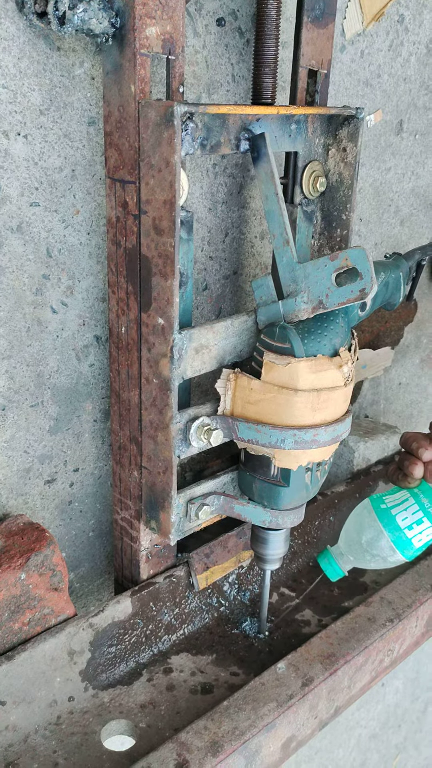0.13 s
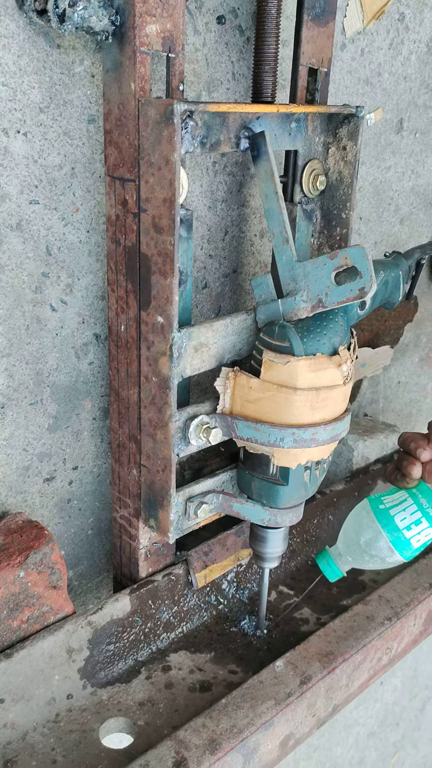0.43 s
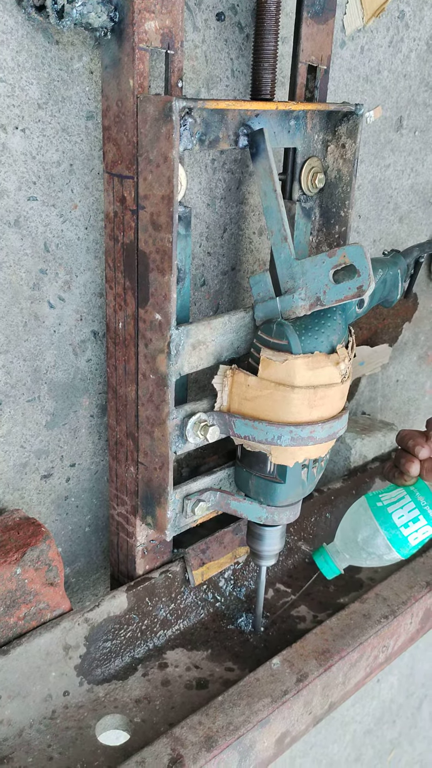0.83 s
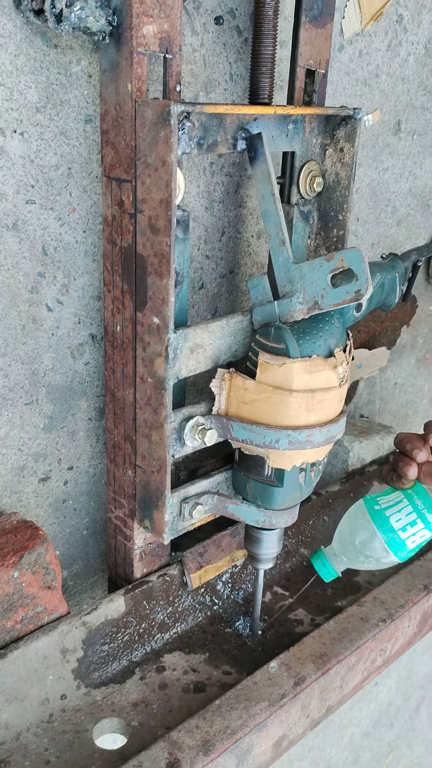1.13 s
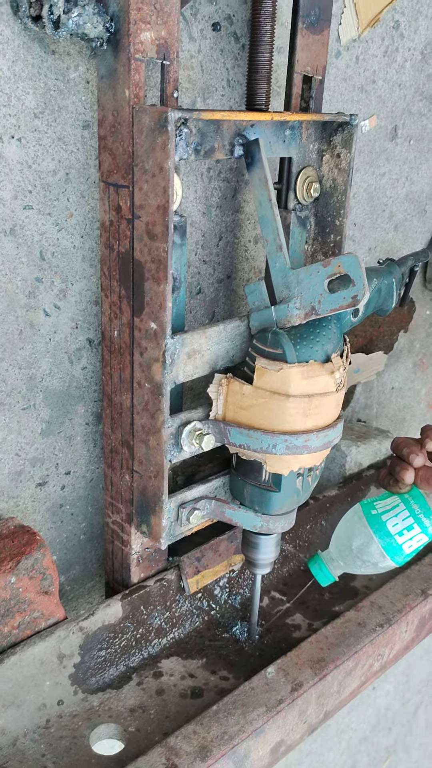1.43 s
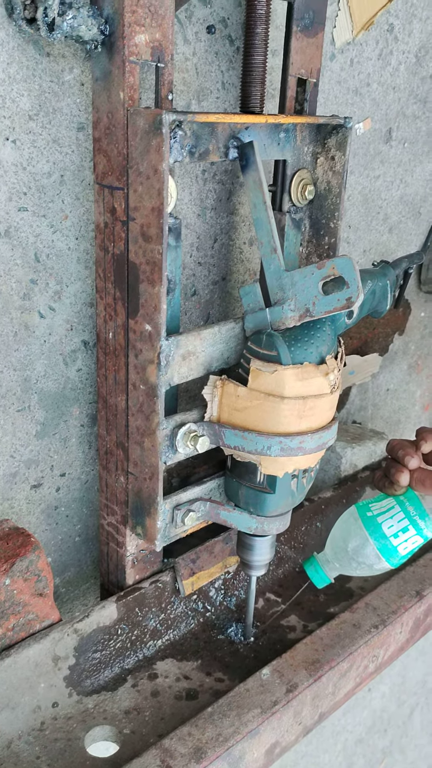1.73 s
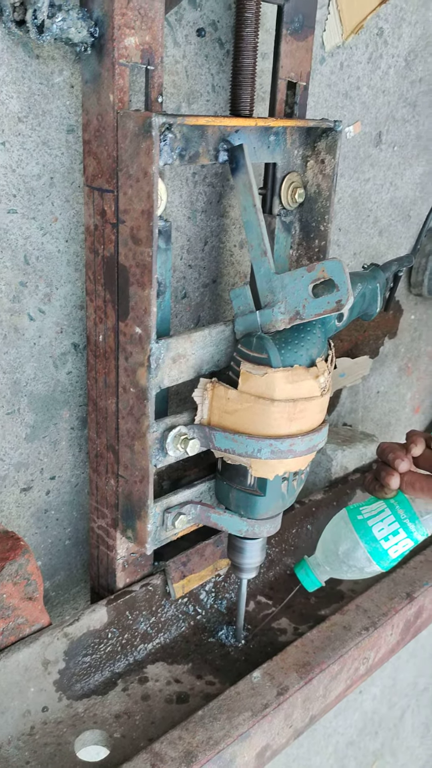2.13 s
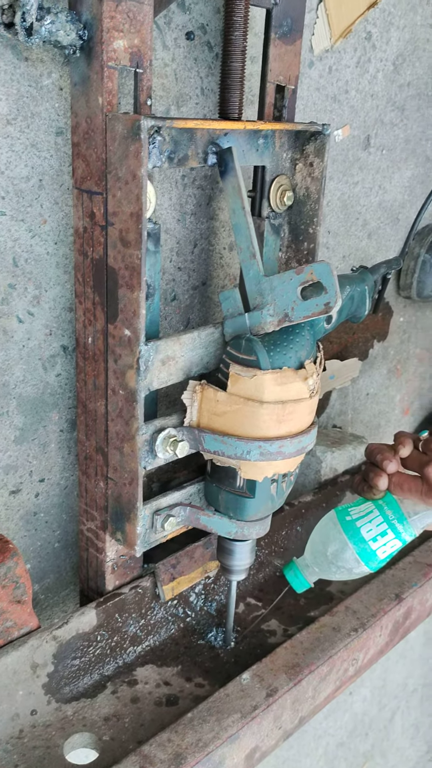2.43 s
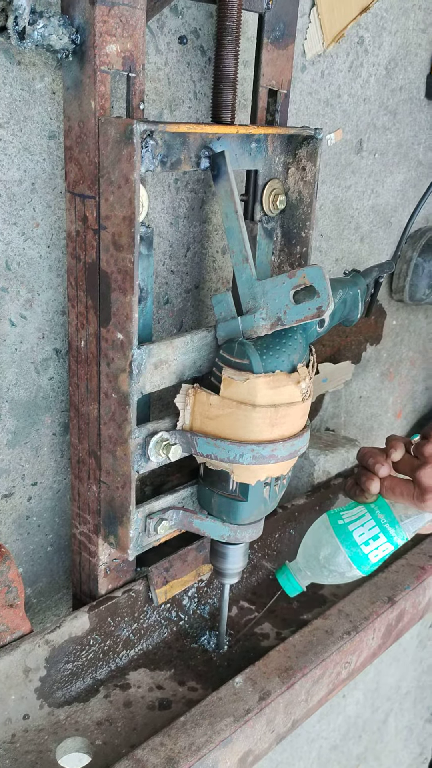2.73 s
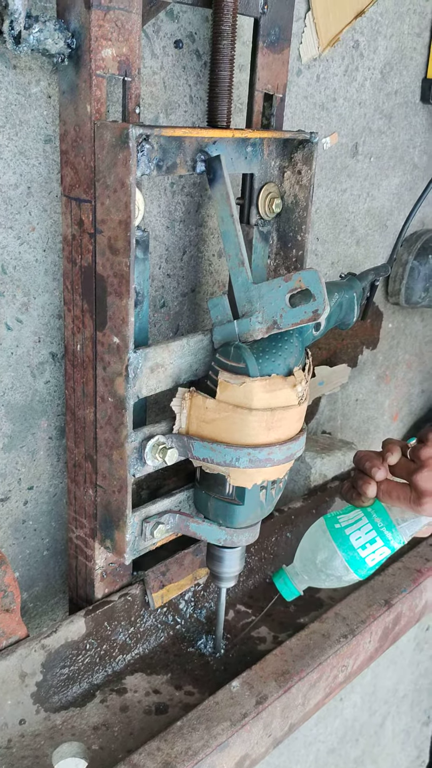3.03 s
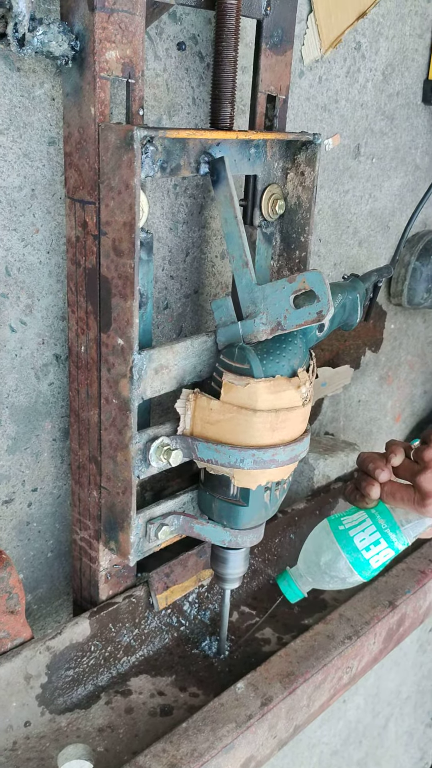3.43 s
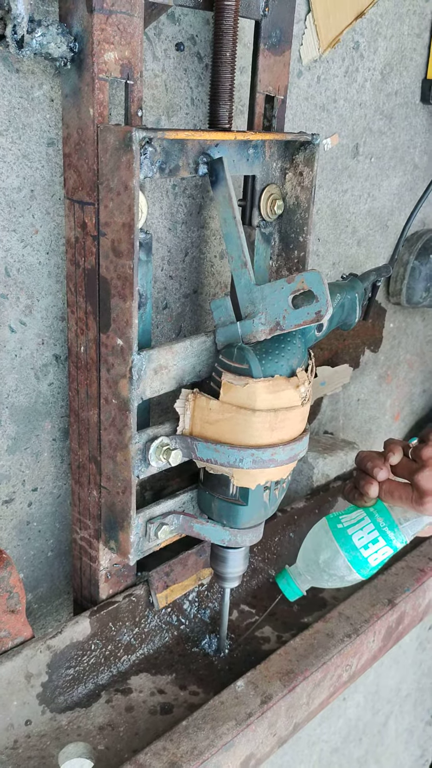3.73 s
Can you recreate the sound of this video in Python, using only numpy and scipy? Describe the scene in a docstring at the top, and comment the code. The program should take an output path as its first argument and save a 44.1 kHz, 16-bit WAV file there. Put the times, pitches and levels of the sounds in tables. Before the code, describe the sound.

An electric drill runs loudly throughout, boring steel close to stereo microphones in a workshop with short echo. Its fluttering gear whine, about 1.5 kHz, rises until 1.2 s, sags to about 2.2 s, climbs to 3.2 s, then eases slightly. Fan rush, gritty grinding and fine chip crackle continue. Scraping screeches swell around 0.2, 0.4 and 2.3 s; dull stand knocks and low rumble occur mainly before 1.4 s.

```python
"""An electric drill, clamped in a feed stand, bores into a steel beam close to a pair of microphones.
Its gears whine at the tooth-mesh rate and two harmonics, fluttering with each spindle turn; weaker tones
of fan, armature and gear sidebands glide through body resonances, over the shaped noise of fan and grinding.
The motor sags as the feed presses harder and the grinding swells; the whine wanders between left and right.
Gaussian bursts of noise scrape and screech, chips crackle, a low rumble varies and the stand knocks dully."""
import sys
import numpy as np
from scipy import signal
from scipy.fft import rfft, irfft
from scipy.io import wavfile

SR = 44100
rng = np.random.default_rng(int(sys.argv[2]) if len(sys.argv) > 2 else 0)


def generate_wav(sig):
    """Save sig (samples, or channels by samples) to the path in sys.argv[1] as 16-bit PCM at SR."""
    pcm = np.round(np.clip(np.atleast_2d(sig).T, -1, 1) * 32767).astype(np.int16)
    wavfile.write(sys.argv[1], SR, pcm)


N = 171990
T = np.arange(N) / SR  # t/s
HZ = np.fft.rfftfreq(N, 1 / SR)  # f/Hz


def amp(db):
    """Logarithmic level: decibels to an amplitude ratio."""
    return 10 ** (np.asarray(db) / 20)


def unit(x):
    """Normalisation: scales a signal to an rms of one."""
    return x / np.sqrt(np.mean(abs(x) ** 2) + 1e-20)


def curve(rows, axis=1):
    """Linear interpolation of one table column over time."""
    rows = np.array(rows)
    return np.interp(T, rows[:, 0], rows[:, axis])


def spectrum(rows, axis=1):
    """Interpolation of one table column over log frequency."""
    rows = np.array(rows)
    return np.interp(np.log(HZ + 1), np.log(rows[:, 0]), rows[:, axis])


def colour(x, db):
    """Linear filtering: multiplies the spectrum by a gain at each frequency."""
    return irfft(rfft(x) * amp(db), N)


def wander(hz):
    """Low-pass random fluctuation of unit rms, its spectrum halved in amplitude at hz."""
    lowpass = 1 / (1 + (HZ / hz) ** 2)
    return unit(irfft(rfft(rng.standard_normal(N)) * lowpass, N))


def complex_wander(hz):
    """Random modulation of amplitude and phase: independent real and imaginary fluctuations."""
    return wander(hz) + 1j * wander(hz)


def rightward(db):
    """Level-difference panning: left lowered and right raised by db."""
    return amp([[-db], [db]])


def cycle(turns):
    """Rotating phasor: one revolution per turn, from a random starting phase."""
    return np.exp(2j * np.pi * (turns + rng.random()))


def swell(s, half):
    """Gaussian envelope: peaks at s and falls to 1/e after half a length either side."""
    return np.exp(-((T - s) / half) ** 2)


ROOM_T60_S, ROOM_DB = 0.32, -13.5  # decay time; echo level against the direct sound


def workshop(x):
    """Diffuse reverberation: convolution with decaying noise, independent at each microphone."""
    t = T[:SR // 3]
    tails = rng.standard_normal((2, len(t))) * amp(-60 * t / ROOM_T60_S)
    tails *= amp(ROOM_DB) / np.linalg.norm(tails, axis=1, keepdims=True)
    echo = signal.oaconvolve(x * np.ones((2, 1)), tails, axes=1)[:, :N]
    return x + echo


# runout of the uneven gear wheel, before the flutter factor of each harmonic
# (cycles per spindle turn, depth/dB)
WHEEL_RUNOUT = [(1, -19), (2, -32), (3, -29), (4, -30), (5, -29), (6, -49)]
RUNOUT_SWING = 0.73  # imaginary (phase) part of the runout, relative to the real (amplitude) part
MAINS_PULSE_HZ, MAINS_DEPTH = 100, 0.027
SHIMMER, SHIMMER_HZ = 0.081, 138  # random modulation: rms of each part, corner f/Hz
WHINE_DRIFT_DB, WHINE_DRIFT_HZ = 1.2, 9  # rms level drift/dB, corner f/Hz


def gear_tone(mesh, spindle, levels, flutter):
    """Tooth-mesh radiation: a tone with sidebands from wheel runout, mains pulsing and shimmer."""
    runout = sum(amp(db) * cycle(-k * spindle) for k, db in WHEEL_RUNOUT)
    wobble = runout.real + 1j * RUNOUT_SWING * runout.imag
    wobble = wobble + MAINS_DEPTH * cycle(MAINS_PULSE_HZ * T).real
    left = amp(curve(levels, axis=1)) * np.exp(1j * curve(levels, axis=3))
    right = amp(curve(levels, axis=2))
    ports = np.array([left, right])
    ports *= amp(WHINE_DRIFT_DB * np.array([wander(WHINE_DRIFT_HZ) for _ in ports]))
    shimmer = SHIMMER * np.array([complex_wander(SHIMMER_HZ) for _ in ports])
    modulation = 1 + flutter * (wobble + shimmer)
    return np.sqrt(2) * (ports * cycle(mesh) * modulation).real


# harmonics of the tooth mesh at the microphones, before drift and flutter
# (t/s, left level/dB, right level/dB, left phase lead/rad)
WHINE_LEVELS = [(0.0, -21, -29, 2.2), (0.09, -25, -18.5, 0.91), (0.21, -14.5, -22.5, 1.6),
                (0.39, -14.5, -16, 1.46), (0.54, -16.5, -16.5, 2.57), (0.63, -13.5, -17, 2.25),
                (0.69, -17, -18.5, 2.63), (0.9, -15.7, -19.5, 2.57), (0.99, -21.5, -20.5, 2.7),
                (1.2, -20, -26.5, 2.95), (1.4, -18, -17, 2.83), (1.43, -19, -16.5, 2.07),
                (1.53, -14, -17.5, 2.08), (1.74, -14, -17.2, 1.91), (1.86, -15, -20.5, 1.9),
                (2.1, -17.5, -18.5, 2.16), (2.22, -18, -15.5, 1.62), (2.28, -20.5, -17, 1.6),
                (2.4, -15, -20, 1.42), (2.67, -14.5, -16.5, 2.07), (2.76, -16.5, -19, 2.25),
                (2.82, -18, -16, 2.09), (3.33, -18, -20.5, 3.05), (3.69, -12.5, -17, 1.92),
                (3.78, -14, -19.5, 2.36), (3.89, -12, -18, 2.05)]
OCTAVE_LEVELS = [(0.0, -26, -23, 2.5), (0.09, -18, -19, 1.57), (0.15, -16, -20, 2.0), (0.21, -21, -20.5, 5),
                 (0.27, -23, -19, 4.5), (0.36, -18, -20, 4), (0.48, -27, -21.5, 3), (0.75, -30, -27, 0.8),
                 (0.81, -30, -37, 3.5), (0.835, -21, -23, 8), (0.9, -23, -18.5, 7), (1.02, -29, -22, 8.5),
                 (1.2, -30, -24, 7), (1.3, -28, -23, 7.5), (1.38, -26, -16.8, 5.0), (1.44, -29, -32, 4),
                 (1.59, -19, -22, 3.5), (1.69, -24, -20, 4), (1.73, -28, -29, 1), (1.77, -26.5, -22.5, 0.3),
                 (1.89, -26, -20.5, -0.5), (2.16, -19.5, -42, -1), (2.31, -12.5, -16, -2.5),
                 (2.4, -18, -17, -1), (2.7, -26, -22.5, -1.1), (2.85, -29, -24.5, -5), (3.04, -34, -29, -5),
                 (3.09, -20.5, -34, -8), (3.18, -24.2, -21.5, -8), (3.42, -25, -21, -7.0),
                 (3.48, -26, -30, -5), (3.65, -29, -31, -7), (3.73, -26, -24.5, -8.5),
                 (3.89, -32, -29, -5.5)]
THIRD_LEVELS = [(0.0, -28, -26, -1.5), (0.21, -42, -33, -2), (0.42, -34, -23, -3), (0.57, -39, -37, -4.5),
                (0.9, -33, -28, -2), (1.23, -45, -37.2, -9.1), (1.38, -35, -27.5, -11),
                (1.71, -32.4, -26, -11), (1.83, -42.1, -29.5, -6), (2.22, -54, -30, 2),
                (2.28, -46, -19.5, -11), (2.37, -36, -29.5, -7.5), (3.3, -41, -30.5, -11.5),
                (3.7, -37, -24.5, -11), (3.89, -32, -23, -11)]
OCTAVE_FLUTTER, THIRD_FLUTTER = 1.74, 1.8  # relative to the whine's flutter


def gears(mesh, spindle):
    """Harmonic series: the tooth-mesh fundamental with its second and third harmonics."""
    whine = gear_tone(mesh, spindle, WHINE_LEVELS, 1)
    octave = gear_tone(2 * mesh, spindle, OCTAVE_LEVELS, OCTAVE_FLUTTER)
    third = gear_tone(3 * mesh, spindle, THIRD_LEVELS, THIRD_FLUTTER)
    return whine + octave + third


# resonances of housing, stand and beam (f/Hz, width/Hz, lift/dB; negative lifts are dips)
BODY_MODES = [(760, 105, 3), (806, 39, -4), (1047, 20, 6.5), (1205, 95, 5), (1950, 134, 7.5), (2260, 67, 8),
              (2458, 89, 5), (3590, 42, -3), (3700, 42, 9), (3803, 80, 3.5), (3910, 70, 6), (4320, 50, 6.5),
              (4500, 56, -3), (5380, 154, 8.5), (6065, 60, 13), (6265, 54, 17), (6660, 50, 19),
              (7530, 120, 8.5)]


def body_db():
    """Modal response: a sum of resonance curves, in dB, at each frequency."""
    return sum(db / (1 + ((HZ - hz) / (width / 2)) ** 2) for hz, width, db in BODY_MODES)


# single tones that ring out (t/s, half length/s, multiple of the motor speed, lift/dB)
TONE_RING_OUTS = [(.15, 0.055, 10, 12), (0.19, 0.086, 2, 9.5), (.6, .15, 2, 9), (3.5, 0.23, 2, 8),
                  (0.153, .05, 6, 4), (1.883, 0.15, 6, 8.5), (2.132, 0.051, 6, 10.5), (2.49, .04, 6, 11),
                  (3.08, .13, 6, 6)]


def ring_out_db(multiple):
    """Transient emphasis: the passing lift, in dB, of the tone at one multiple."""
    return sum(lift * swell(s, half) for s, half, k, lift in TONE_RING_OUTS if k == multiple)


# fan, armature and gear tones, before body and echo
# (multiple of the motor speed, left level/dB, right level/dB, left phase lead/rad)
SHAFT_TONES = [(1, -50, -48.5, 0.11), (2, -46, -55, 0.28), (3, -49.5, -49, 0.92), (5, -41.5, -48, 0.92),
               (6, -40.5, -41.5, 0.048), (9, -45, -38.5, 1.1), (10, -42, -36.5, 1), (11, -46, -48, 1.4),
               (14, -51.5, -38, 1.6), (20, -41.5, -58, 0.71), (39, -48.5, -47, 2.9)]
# gear wheel sidebands, mostly about five times the spindle rate either side of a whole multiple
# (multiple of the motor speed)
SIDEBAND_MULTIPLES = [2.52, 5.524, 7.08, 9.524, 10.476]
# their levels, before body and echo (left level/dB, right level/dB, left phase lead/rad)
SIDEBAND_LEVELS = [(-49, -51, 0.64), (-45, -42.5, 0.58), (-44, -50, 3.3), (-36.5, -37.5, 1.36),
                   (-41.5, -51, 2.1)]
# the bit bites harder and the gears strain; also played by scrapes()
# (t/s, half length/s, grinding level/dB, lift of the high tones/dB)
HARD_BITES = [(0.185, 0.12, -25, 5), (0.363, 0.073, -28.5, 1), (2.32, 0.2, -26.5, 0)]
TONE_FLUTTER = 0.14  # depth for multiples of ten and above
TONE_BLUR, BLUR_HZ_PER_MULTIPLE = 0.55, 3  # depth for multiples of ten and above; corner f/Hz


def motor_tones(turns, spindle):
    """Order tones of a rotating machine: they track the shaft and glide through body resonances."""
    rows = list(SHAFT_TONES)
    rows += [(k, *levels) for k, levels in zip(SIDEBAND_MULTIPLES, SIDEBAND_LEVELS)]
    strain_db = sum(lift * swell(s, half) for s, half, _, lift in HARD_BITES)
    out = np.zeros((2, N))
    for multiple, left_db, right_db, lead in rows:
        height = min(multiple / 10, 1)  # high tones feel runout and strain the most
        flutter = 1 + TONE_FLUTTER * height * (cycle(spindle) + cycle(3 * spindle)).real
        depth = TONE_BLUR * np.sqrt(height)
        blur = depth * complex_wander(BLUR_HZ_PER_MULTIPLE * multiple)
        blurred = (amp(ring_out_db(multiple)) + blur) / np.sqrt(1 + 2 * depth ** 2)  # keeps the mean power
        level = flutter * amp(strain_db * height ** 2) * blurred
        ports = np.array([[amp(left_db) * np.exp(1j * lead)], [amp(right_db)]])
        out += np.sqrt(2) * (level * ports * cycle(multiple * turns)).real
    return colour(workshop(out), body_db())


def tooth_grit(spindle, size=1200):
    """Periodic roughness: one random tooth surface read again on every spindle turn."""
    surface = signal.resample(rng.standard_normal(size), size * 16)
    return unit(np.interp(spindle % 1, np.arange(len(surface)) / len(surface), surface))


# fan rush and grinding, before body and load (f/Hz, left level/dB per Hz, right level/dB per Hz)
RUSH_COLOUR = [(20, -92, -89), (45, -86, -88), (80, -71, -71.5), (120, -68, -67), (172, -65.5, -65.5),
               (248, -72.5, -73.5), (405, -74, -69.5), (575, -69, -67.5), (795, -66.5, -67.5),
               (1280, -72.5, -66), (1540, -57.5, -64.5), (1840, -63.5, -60), (2450, -57.5, -56),
               (2910, -60, -59.5), (3020, -55, -53), (3820, -62, -55.5), (4200, -68, -57.5),
               (4740, -57, -56), (5470, -67, -62.5), (6290, -69.5, -71.5), (6630, -71.5, -79),
               (8000, -63, -65), (9900, -63.5, -70), (10820, -73.5, -75.5), (12160, -75.5, -73.5),
               (12000, -99, -99), (14600, -89, -90)]
# correlation of left and right (f/Hz, coefficient)
LEFT_RIGHT_LIKENESS = [(40, 0.7), (160, 0.88), (270, 0.48), (450, 0.7), (750, 0.76), (1250, 0.32),
                       (2000, 0.62), (3300, 0.22), (5500, 0.1), (15000, -0.081)]
# power share of the noise that repeats with each spindle turn (f/Hz, share)
REPEATING_SHARE = [(400, .03), (1300, .2), (3500, .36), (4500, .17), (8000, .05)]
# change of the grinding under load (f/Hz, gain/dB per 10 % of sag in speed)
GRINDING_LOAD_GAIN = [(100, 1), (1200, -1), (2200, 2.5), (3500, 2), (5500, 0), (8000, -0.5), (12000, -1)]
REFERENCE_SPEED = 373  # turns per second at which the load is zero
ROTOR_PULSE, SPINDLE_PULSE = 0.032, 0.02  # modulation depths
FLICKER_DB, FLICKER_HZ = 0.73, 23  # rms level flicker/dB, corner f/Hz
BODY_IN_RUSH = 0.44  # share of the body's lift that the broad noise gets


def rush(speed, turns, spindle):
    """Broadband noise of air and grit: partly correlated, pulsing with the shafts, tilted by load."""
    share = spectrum(REPEATING_SHARE)

    def grinding():
        steady = rfft(rng.standard_normal(N))
        return np.sqrt(1 - share) * steady + np.sqrt(share) * rfft(tooth_grit(spindle))

    a, b = grinding(), grinding()
    same = spectrum(LEFT_RIGHT_LIKENESS)
    pair = irfft(np.array([a, same * a + np.sqrt(1 - same ** 2) * b]), N)
    pair *= 1 + ROTOR_PULSE * cycle(turns).real
    pair *= 1 + SPINDLE_PULSE * cycle(spindle).real
    pair *= amp(FLICKER_DB * wander(FLICKER_HZ))
    density_db = np.array([spectrum(RUSH_COLOUR, axis=1), spectrum(RUSH_COLOUR, axis=2)])
    pair = np.sqrt(SR / 2) * colour(pair, density_db + BODY_IN_RUSH * body_db())
    load = 10 * (1 - speed / REFERENCE_SPEED)  # one per 10 % of sag
    gain_db = spectrum(GRINDING_LOAD_GAIN)
    light, heavy = colour(pair, -gain_db / 2), colour(pair, gain_db / 2)
    return light + (heavy - light) * (load + 0.5)  # crossfades, and extrapolates beyond either end


# the middle of the grinding thins for a while (t/s, half length/s, f/Hz, width/Hz, gain/dB)
GRINDING_THINNING = (3.5, 0.6, 2350, 450, -6)


def thinned(x):
    """Time-varying filtering: a Gaussian envelope fades one band down and back."""
    s, half, hz, width, db = GRINDING_THINNING
    filtered = colour(x, db * np.exp(-(2 * (HZ - hz) / width) ** 2))
    return x + swell(s, half) * (filtered - x)


CHIPS_PER_S, CHIPS_DB = 420, -33  # mean rate, rms level
CHIP_SPREAD_DB = 2.4  # scale of the exponential spread in level
# colour of the crackle, before the body (f/Hz, relative level/dB)
CRACKLE_COLOUR = [(500, -33), (2000, -2.5), (4800, -4), (6500, -11), (11000, -28), (14000, -55)]


def chips():
    """Random impulse train: chips snap off independently, with scattered level and polarity."""
    snapped = rng.random(N) < CHIPS_PER_S / SR
    snaps = snapped * amp(CHIP_SPREAD_DB * np.minimum(rng.exponential(1, N), 4))
    crackle = workshop(snaps * rng.choice([-1, 1], (2, N)))
    return amp(CHIPS_DB) * unit(colour(crackle, spectrum(CRACKLE_COLOUR) + body_db()))


# swells and lulls of the rumble, before panning (t/s, level/dB)
RUMBLE_LEVELS = [(0, -46), (.25, -55), (.45, -43), (.8, -47), (1.05, -44), (1.35, -53), (1.6, -62),
                 (3.1, -63), (3.8, -54)]
# its spectrum (f/Hz, relative level/dB)
RUMBLE_SPECTRUM = [(20, -35), (70, -14), (115, -1), (160, -1), (260, -10), (600, -37), (3000, -80)]
RUMBLE_LUMPS_DB, RUMBLE_LUMPS_HZ = 2, 40  # rms level fluctuation/dB, corner f/Hz
RUMBLE_PAN_DB, RUMBLE_SPREAD = 4, 0.54  # spread: independent noise relative to the common part


def rumble():
    """Low-frequency noise: partly common to both sides, with random amplitude modulation."""
    noise = rng.standard_normal(N) + RUMBLE_SPREAD * rng.standard_normal((2, N))
    noise *= amp(RUMBLE_LUMPS_DB * wander(RUMBLE_LUMPS_HZ))
    low = unit(colour(noise, spectrum(RUMBLE_SPECTRUM)))
    return amp(curve(RUMBLE_LEVELS)) * rightward(RUMBLE_PAN_DB) * low


# grit of a scrape, before the body (f/Hz, relative level/dB)
SCRAPE_SPECTRUM = [(200, -48), (780, -15), (1200, -13), (2300, -25), (3000, 1), (3750, -7), (4400, 11),
                   (5400, -9), (7000, -9), (10000, -2.5), (13000, -25)]
# narrow modes that screech during a bite (f/Hz, width/Hz, relative level/dB)
SCREECH_MODES = [(3520, 42, -11), (3800, 30, 2.5), (4490, 53, 1), (5340, 170, -9), (6026, 62, 3),
                 (6260, 92, -4), (6860, 89, -8), (7640, 140, -9.5), (8420, 90, -11)]
SCREECH_DB, SCRAPE_PAN_DB = 2.5, 1  # screech against grit; pan


def scrapes():
    """Friction-excited resonance: each bite swells broadband grit and a screech of narrow modes."""
    level = sum(amp(db) * swell(s, half) for s, half, db, _ in HARD_BITES)
    friction = rng.standard_normal((2, N))
    grit = unit(colour(friction, spectrum(SCRAPE_SPECTRUM) + body_db()))
    modes = sum(amp(db) / (1 + 2j * (HZ - hz) / width) ** 2 for hz, width, db in SCREECH_MODES)
    screech = amp(SCREECH_DB) * unit(irfft(rfft(friction) * modes, N))
    return level * rightward(SCRAPE_PAN_DB) * (grit + screech)


# low knocks of stand and beam, before echo and panning (t/s, f/Hz, level of the envelope's peak/dB)
STAND_KNOCKS = [(0.433, 130, -32), (0.513, 198, -33), (0.595, 115, -35), (0.66, 135, -31),
                (0.781, 125, -31.5), (0.927, 129.7, -33), (0.977, 135, -31), (1.05, 150, -34),
                (1.107, 180, -31.5), (1.154, 130, -33), (1.377, 161, -34)]
KNOCK_RISE_S, KNOCK_PAN_DB = 0.004, 1.5


def knocks():
    """Impact response: heavily damped sinusoids, each a dull thud of a few cycles."""
    out, t = np.zeros(N), T[:SR // 10]
    envelope = t / KNOCK_RISE_S * np.exp(1 - t / KNOCK_RISE_S)
    for s, hz, db in STAND_KNOCKS:
        start = round(s * SR)
        out[start:start + len(t)] += amp(db) * envelope * np.sin(2 * np.pi * hz * t)
    return rightward(KNOCK_PAN_DB) * workshop(out)


# motor speed (t/s, turns per second)
MOTOR_SPEED = [(0.0, 365), (0.04, 367), (0.25, 384), (0.52, 397), (0.71, 408), (1.12, 404), (1.21, 413.48),
               (1.32, 412), (1.45, 399), (1.61, 394), (1.7, 387), (1.77, 383), (1.9, 382.42), (2.0, 378),
               (2.12, 380.22), (2.28, 378.5), (2.59, 395.6), (2.87, 402), (3.17, 415), (3.4, 408),
               (3.75, 393), (3.89, 394)]
PINION_TEETH, WHEEL_TEETH = 4, 42
JITTER_TURNS, JITTER_HZ = 0.0014, 60  # rms shaft jitter in turns, corner f/Hz


def scene():
    """Kinematic coupling: one shaft speed drives all the tones and the grinding."""
    speed = curve(MOTOR_SPEED)
    turns = np.cumsum(speed) / SR + JITTER_TURNS * wander(JITTER_HZ)
    mesh = turns * PINION_TEETH
    spindle = mesh / WHEEL_TEETH
    drill = gears(mesh, spindle) + motor_tones(turns, spindle)
    grinding = thinned(rush(speed, turns, spindle))
    return drill + grinding + chips() + rumble() + scrapes() + knocks()


EDGE_HZ = 15700


def record(dry):
    """Band limitation: a symmetric low-pass filter removes the extreme treble."""
    lowpass = signal.firwin(511, EDGE_HZ, window=("kaiser", 9), fs=SR)
    return signal.oaconvolve(dry, lowpass[None], "same")


dry = scene()
out = record(dry)
generate_wav(out)
```